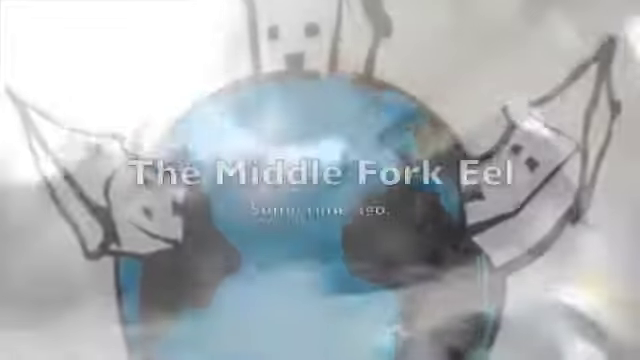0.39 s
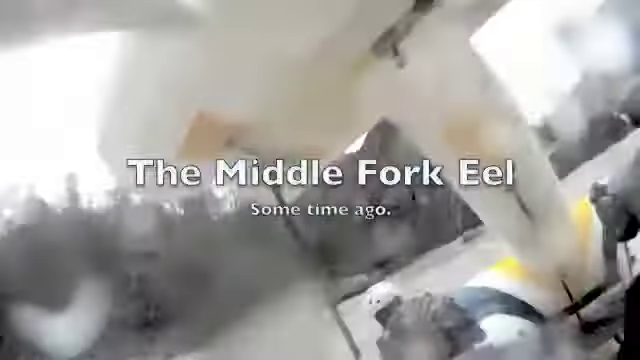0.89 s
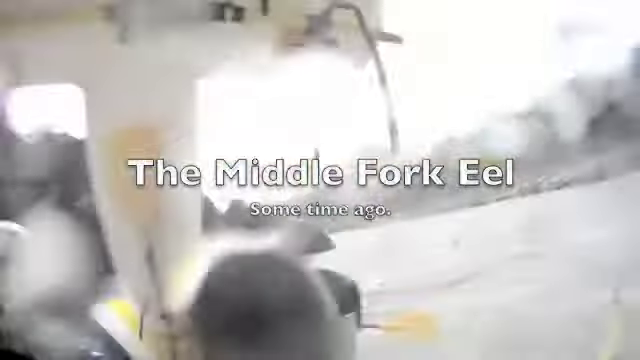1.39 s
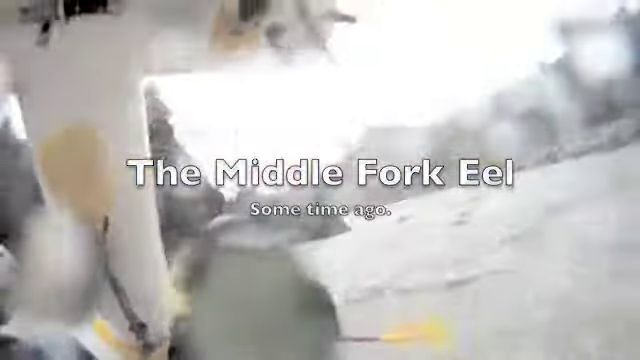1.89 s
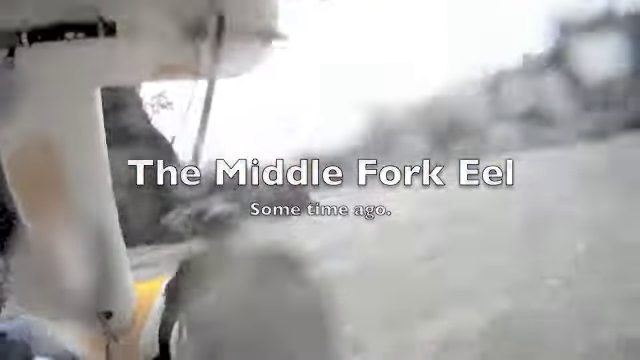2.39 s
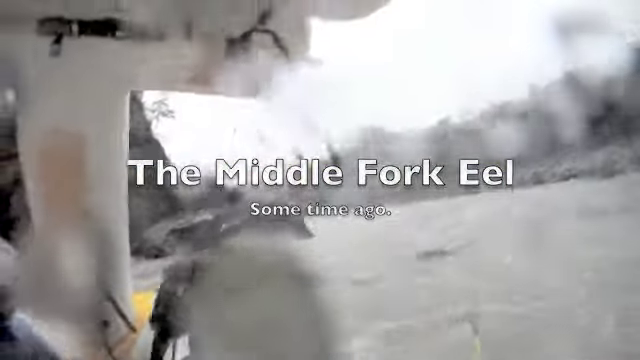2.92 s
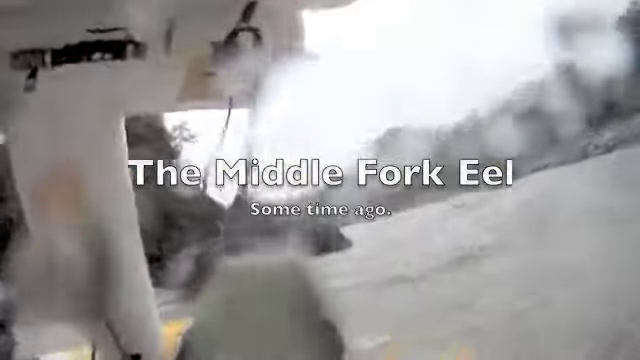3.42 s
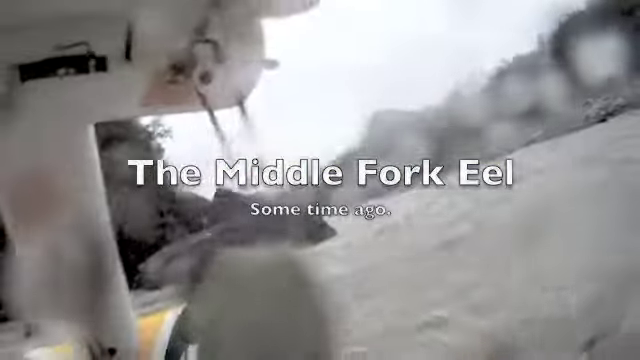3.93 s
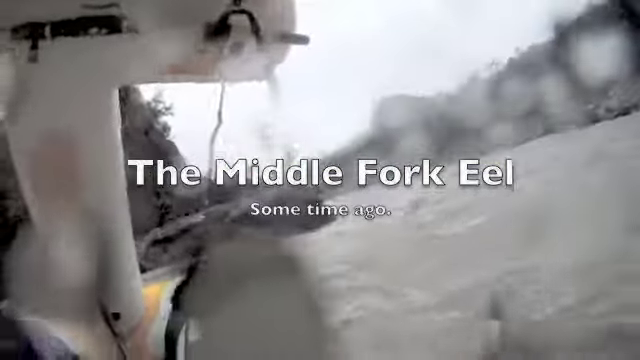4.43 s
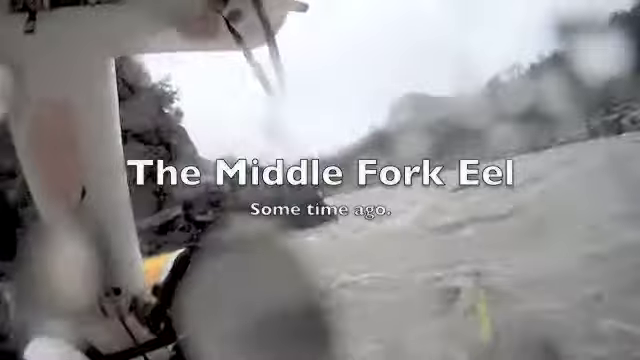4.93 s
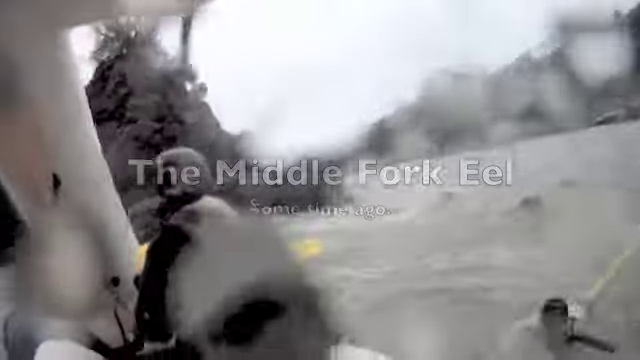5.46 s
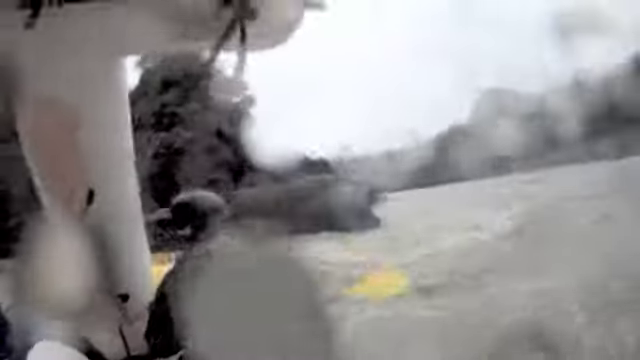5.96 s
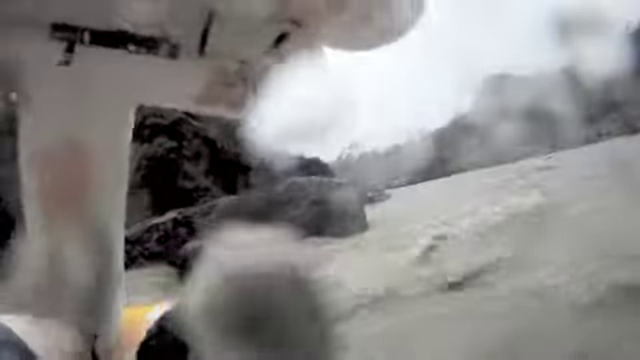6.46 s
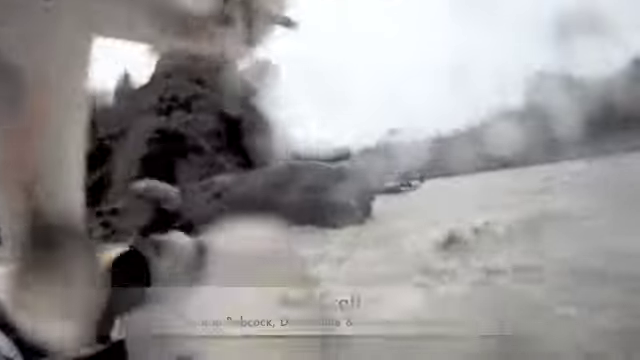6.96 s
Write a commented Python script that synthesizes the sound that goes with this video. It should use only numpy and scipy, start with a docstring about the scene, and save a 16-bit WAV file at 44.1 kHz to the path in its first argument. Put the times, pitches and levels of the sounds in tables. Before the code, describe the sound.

Hissing, foamy river rush fades in from silence, boxy and gritty, while loose straps click against the casing and dull thumps shake the mount.

```python
"""A river's rush and bursting foam fade in, heard through the ringing sealed housing of a small camera on a raft.
Loose straps knock on it in short four-note chords; bumps push the frame and rubs slip and scrape along it.
Droplets patter on the shell; the mount trembles at a low pitch over the dull wash under the raft.
Shaped noise makes the water, decaying sines the knocks, pulses and resonators the bumps and sway.
The recorder holds each of its 12000 samples a second, which mirrors the sound above 6 kHz."""
import sys
import numpy as np
from scipy import signal
from scipy.fft import rfft, irfft
from scipy.io import wavfile
from scipy.ndimage import uniform_filter1d

SR = 44100
rng = np.random.default_rng(int(sys.argv[2]) if len(sys.argv) > 2 else 0)


def transcribe(u):
    """Save the signal u as a 16-bit wav file named by the first command-line argument.

    u: samples, shape (n,) or (channels, n), limited to [-1, 1]; the rate is SR.
    q: integer samples, one column per channel.
    """
    v = np.clip(np.atleast_2d(u).T, -1, 1)
    q = np.round(v * 32767).astype(np.int16)
    wavfile.write(sys.argv[1], SR, q)


def boost_factor(decibels):
    """Convert a level in decibels to a linear amplitude factor."""
    exponent = np.asarray(decibels, float) / 20
    return 10 ** exponent


N = 312669
T = np.arange(N) / SR  # time in s
HZ = np.arange(1025) * SR / 2048 + 1  # filter grid, moved up 1 Hz so that its logarithm exists


def shape(x, gain):
    """Minimum-phase filter with the given gain on the HZ grid, made by folding its cepstrum forward."""
    cepstrum = irfft(np.log(gain))
    cepstrum[1:1024] *= 2
    cepstrum[1025:] = 0
    impulse = irfft(np.exp(rfft(cepstrum)))
    return signal.fftconvolve(x, impulse)[:N]


def colour(points):
    """Gain curve drawn through (Hz, dB) points along a logarithmic pitch axis."""
    hz, db = np.transpose(points)
    return boost_factor(np.interp(np.log(HZ), np.log(hz), db))


def ring(x, hz, t60):
    """One resonant mode driven by x, dying away by 60 dB in t60 seconds."""
    pole = np.exp(2j * np.pi * hz / SR - np.log(1000) / (t60 * SR))
    return signal.lfilter([1], [1, -pole], x).imag


def unit(x):
    """Scale to an rms of 1."""
    return x / np.sqrt(np.mean(x ** 2))


def walk(rate):
    """Smooth random drift: levels held 1 / rate s, slewed twice, scaled to an rms of 1."""
    hold = int(SR / rate)
    steps = np.repeat(rng.standard_normal(N // hold + 1), hold)
    slewed = uniform_filter1d(uniform_filter1d(steps, hold), hold)
    return unit(slewed[:N])


def add(out, s, wave):
    """Mix a short wave in at s seconds."""
    i = int(s * SR)
    out[i:i + len(wave)] += wave[:N - i]


# resonances of the sealed shell: pitch_hz, width_hz, lift_db
SHELL_MODES = [(830, 160, 3), (1166, 226, 10.5), (1463, 140, 4.5), (1687, 122, 4), (2063, 240, 4.5),
               (2740, 120, 2.5), (3570, 705, 9.5), (5050, 360, 3.5)]


def housing(x):
    """The sealed shell lifts its own resonances in all it passes on."""
    lift_db = sum(db / (1 + (2 * (HZ - hz) / width) ** 2) for hz, width, db in SHELL_MODES)
    return shape(x, boost_factor(lift_db))


# spectrum of white water, also worn by the spray: pitch_hz, relative_density_db
RUSH_COLOUR = [(400, -16.5), (600, -17), (900, -16), (1400, -12.5), (2000, -2.5), (2700, -5.5), (3300, -12),
               (4300, -16), (5200, -18.5), (5700, -19), (6000, -25.5)]


def rush(level_db, bright_db):
    """White water: hiss and bursting foam in half-octave bands that flicker separately under a shared surge."""
    pop_db = 2.7 * np.minimum(rng.exponential(size=N), 4.0)
    pops = (rng.random(N) < 900 / SR) * rng.standard_normal(N) * boost_factor(pop_db)  # 900 a second on average
    foam = 0.7 * unit(pops)
    surge = boost_factor(0.81 * walk(9) + 0.51 * walk(70))
    water = 0
    for hz in 420 * 2 ** np.arange(0, 4.5, .5):
        band_filter = signal.butter(2, [hz / 2 ** .25, hz * 2 ** .25], "band", fs=SR)
        band = signal.lfilter(*band_filter, rng.standard_normal(N) + foam)
        tilt_db = bright_db * np.log2(hz / 1800)
        water = water + band * boost_factor(.6 * walk(30) + tilt_db)
    return boost_factor(level_db + 1.32) * surge * unit(housing(shape(water, RUSH_GAIN)))


RUSH_GAIN = colour(RUSH_COLOUR)

# strap knocks: start_s, strike_db, main_pitch_hz, low_note_db and high_note_db (both against the main note)
STRAP_KNOCKS = [(0.5531, -30, 2030, 2, -20), (1.1989, -6, 2380, -19.5, -11),
                (1.2912, -24.5, 1830, -11, -16), (1.5262, -32, 2360, -20, -4),
                (2.4316, -21, 2000, -12, -17), (2.4378, -29, 1950, -17, -4.5), (2.4454, -28, 2060, 5, -30),
                (2.5036, -32, 2100, -15, -27), (2.7726, -12.5, 2000, -11.5, -14),
                (2.8494, -20, 2220, -8.5, 1), (3.4211, -17, 2080, -39, -12.5),
                (3.6194, -19.5, 2270, -31, -12), (3.6418, -30, 1800, -4, -21),
                (3.8377, -13.5, 2160, -9.5, -11.5), (4.067, -39, 2030, 5.5, -17),
                (4.0948, -24.5, 2050, 1, -20), (4.1026, -22, 1840, -17, -33),
                (4.5117, -30.5, 1830, -7, -13), (4.7722, -21, 2160, -35, -12),
                (4.9096, -25, 1950, -17, -26), (5.0095, -24, 2150, -28, -9), (5.0838, -25, 2110, -22, -13),
                (5.2649, -23, 1780, -4.5, -33), (5.5992, -26.5, 1650, -5, -15),
                (5.7607, -18, 1760, -16, -11), (6.1796, -27.5, 1930, -7, -11),
                (6.2268, -19.5, 1970, -5.5, -7.5), (6.2875, -30, 1700, -6, -19),
                (6.318, -26.5, 1680, -4, -20)]
# spectrum of the rattle after a knock: pitch_hz, relative_density_db
RATTLE_COLOUR = [(500, -27), (900, -0.5), (1200, 2), (2000, 3), (3000, 1), (4500, -33), (6000, -38)]


def knocks():
    """Loose straps and faint chance taps: a hard contact sounds four notes at once, then a short dull rattle."""
    low_hz, high_hz, top_hz = 1160, 3330, 4610
    notes, rattle, t = np.zeros(N), np.zeros(N), T[:2048]
    # chance taps have the columns of a knock: their averages, then their spreads
    tap, tap_spread, tap_count = (-38.5, 1948, -13, -22), (1.5, 200, 8.7, 5.9), 16
    tap_values = tap + tap_spread * rng.standard_normal((tap_count, 4))
    taps = np.c_[rng.random(tap_count) * T[-1], tap_values]
    for s, db, hz, low_db, high_db in [*STRAP_KNOCKS, *taps]:
        hiss = rng.standard_normal(len(t))
        # a weaker high note makes the knock swell and die sooner
        peak_ms = max(0.65 + 0.022 * high_db, .2)
        u = t / (peak_ms / 1000)
        top_db = 0.5 + 0.86 * low_db + 0.47 * high_db
        chord = np.sin(2 * np.pi * hz * t) + 0.05 * hiss
        chord = chord + boost_factor(low_db) * np.sin(2 * np.pi * low_hz * t)
        chord = chord + boost_factor(high_db) * np.sin(2 * np.pi * high_hz * t)
        chord = chord + boost_factor(top_db) * np.sin(2 * np.pi * top_hz * t)
        add(notes, s, boost_factor(db) * chord * u * np.exp(1 - u))
        decay = np.exp(-np.log(1000) * t / 0.012)  # 60 dB in 12 ms
        add(rattle, s + 0.002492, boost_factor(db + 0.32 * low_db + 4) * hiss[::-1] * decay)
    notes = shape(notes, colour([(300, -21), (900, -11.0), (1500, -3.0), (3600, -4),
                                 (4500, -9), (5100, 0), (6000, -6.5)]))
    return housing(notes + shape(rattle, boost_factor(-7.5) * colour(RATTLE_COLOUR)))


# modes of the frame: pitch_hz, relative_db, t60_s
FRAME_MODES = [(104, 7.5, 0.042), (159, -0.5, 0.033), (211.5, -1.5, 0.065), (297, -27, 0.033),
               (376, -11, 0.022)]


def frame(force):
    """The frame passes a force on and rings with it."""
    return force + sum(boost_factor(db - 37) * ring(force, hz, t60) for hz, db, t60 in FRAME_MODES)


# bumps on the frame: centre_s, push_db, sway_kick_db
FRAME_BUMPS = [(0.561, -39, -29), (0.589, -22.5, -25), (.672, -37, -30), (0.699, -47, -30),
               (1.203, -41, -40), (1.227, -27, -31), (1.291, -44.5, -30.5), (1.316, -57, -34.5),
               (2.421, -31, -48), (2.435, -23, -48), (2.446, -22, -32), (2.465, -25, -24),
               (2.473, -21, -20), (2.519, -37, -34), (2.532, -31.5, -27), (2.546, -48, -19.5),
               (4.596, -34.5, -31), (4.618, -35, -24), (4.645, -20, -24), (4.671, -53, -31),
               (4.713, -33.5, -26.5), (4.745, -55, -28.5)]
# modes of the mount on its arm: pitch_hz, relative_db, t60_s
MOUNT_MODES = [(27.5, -40, 0.056), (39.1, 2.5, 0.22), (57.7, -30, .1)]


def bumps():
    """Soft pushes: a dip in pressure between two small swells, and a kick that sets the mount ringing."""
    push, kick, t = np.zeros(N), np.zeros(N), T[:882] - T[441]
    u = t / (3.3 / 1000 / np.pi)  # the dip crosses zero 3.3 / pi ms either side of its centre
    dip = -(1 - u ** 2) * np.exp(-u ** 2 / 2)
    shove = -np.hanning(len(t)) / 441
    for s, db, sway_db in FRAME_BUMPS:
        add(push, s - T[441], boost_factor(db) * dip)
        add(kick, s - T[441], boost_factor(sway_db) * shove)
    mount = sum(boost_factor(db) * ring(kick, hz, t60) for hz, db, t60 in MOUNT_MODES)
    return frame(push) + mount


# rubs along the frame: fastest_s (middle of the stroke), length_s, slip_db, top_slip_rate_hz, scrape_db
FRAME_RUBS = [(.838, .25, -36.5, 323.4, -39), (1.105, .09, -56, 222, -44), (2.454, .068, -41, 224, -40),
              (4.631, .07, -50, 205, -42)]
# spectrum of the scraping grit: pitch_hz, relative_density_db
SCRAPE_COLOUR = [(400, -24), (700, 2.5), (1200, -6.5), (2000, 8.5), (3000, -4), (4500, -24), (6000, -17)]


def rubs():
    """Stick-slip: slips speed up and slow down, lifted around one frame note, with judder and scraping grit."""
    slope_hz_per_s, turn_s = 1900, .022  # the slip rate climbs and falls at this slope, rounded at the top
    lock_hz, lock_width_hz, lock_lift_db = 224, 58, 8  # slips grow where they meet the frame note
    out = 0
    for s, length, slip_db, top_hz, scrape_db in FRAME_RUBS:
        edge = np.clip((length / 2 - abs(T - s)) / 0.002, 0, 1)
        t = np.clip(T - s, -length / 2, length / 2)
        hz = top_hz - slope_hz_per_s * (np.hypot(t, turn_s) - turn_s)
        # pressure eases towards both ends and along the stroke
        press_db = -19.5 * (2 * t / length) ** 2 - 18 * t
        lock_db = lock_lift_db / (1 + (2 * (hz - lock_hz) / lock_width_hz) ** 2)
        turns = np.cumsum(hz * (1 + .028 * walk(90))) / SR
        slips = np.sin(2 * np.pi * turns) + 0.066 * np.sin(4 * np.pi * turns)
        slips = slips * boost_factor(slip_db + press_db + lock_db + 1.8 * walk(100))
        # a rough tone near the frame note, stronger under faster slips
        judder = unit(ring(ring(rng.standard_normal(N), 220, 0.054), 220, 0.052))
        judder = judder * boost_factor(slip_db + press_db - 10.5 + 0.1119 * (hz - lock_hz))
        # each slip sets off a burst of grit, which wears off over the stroke
        bursts = np.exp(-(turns % 1) / 0.18)
        grit = rng.standard_normal(N) * bursts * boost_factor(2.2 * walk(200) + 0.85 * walk(40))
        scrape = unit(housing(housing(shape(grit, colour(SCRAPE_COLOUR)))))
        scrape = scrape * boost_factor(scrape_db + 0.71 * press_db - 7.5 * t / length)
        out = out + frame(edge * slips) + edge * judder + edge * scrape
    return out


# spray on the housing: start_s, length_s, level_db
SPRAY_FLURRIES = [(1.908, 0.062, -40.5), (2.006, 0.052, -43), (2.16, 0.036, -41.5), (3.505, 0.034, -45),
                  (5.13, .09, -43.5)]


def spray():
    """Flurries of droplets patter on the housing, swell and stop short: uneven noise in the rush's colour."""
    patter = rng.standard_normal(N) * boost_factor(4.1 * walk(300))
    drops = unit(housing(shape(patter, RUSH_GAIN)))
    swell = 0
    for s, length, db in SPRAY_FLURRIES:
        inside = (T > s) * (T < s + length)
        swell = swell + boost_factor(db) * inside * (0.52 + 0.7 * (T - s) / length)
    return uniform_filter1d(swell, size=88) * drops  # 2 ms edges


def sway(level_db):
    """The current keeps the mount trembling: noise through two close low modes in series."""
    tremble = ring(ring(rng.standard_normal(N), 45.1, 0.16), 48.5, 0.1)
    return boost_factor(level_db) * unit(tremble)


# spectrum of the wash: pitch_hz, relative_density_db
WASH_COLOUR = [(40, 6), (90, 1.5), (200, 3.5), (350, 0), (550, -21), (900, -31)]


def wash(level_db):
    """Water slapping under the tubes: a dull uneven rumble of low-coloured noise."""
    rumble = unit(shape(rng.standard_normal(N), colour(WASH_COLOUR)))
    return boost_factor(level_db + 0.57 * walk(11)) * rumble


# course of the river, joined by straight lines: time_s, rush_db, wash_db, sway_db
RIVER_COURSE = [(.3, -45.5, -59.5, -49), (.6, -43.5, -57, -38), (.72, -42.5, -47, -41),
                (.82, -44, -47, -42), (.96, -43, -52, -49), (1.35, -45.5, -56.5, -53),
                (1.84, -44.5, -59.5, -54), (2.3, -47.5, -59, -54), (2.67, -46.5, -55.5, -45.5),
                (3.1, -46, -59.5, -61), (3.7, -46, -57, -56), (3.96, -46, -61, -67), (4.3, -48.5, -58, -59),
                (4.7, -44.5, -54.5, -59.5), (5.15, -43.5, -55.5, -55), (5.58, -43, -56.5, -58.5),
                (5.9, -41, -52.5, -62), (6.6, -42.5, -52.5, -76), (6.82, -41.5, -55.5, -45.5),
                (7.09, -40.5, -52, -62.5)]


def scene():
    """All sources add up at the same single microphone."""
    s, *columns = np.transpose(RIVER_COURSE)
    rush_db, wash_db, sway_db = (np.interp(T, s, c) for c in columns)
    bright_db = -0.69 + 0.84 * walk(3.18)  # drifting tilt of the rush, dB per octave
    river = rush(rush_db, bright_db) + wash(wash_db) + spray()
    raft = sway(sway_db + 2.4 * walk(6)) + knocks() + bumps() + rubs()
    return (river + raft)[None]


def roll_off(x):
    """The treble ends steeply here."""
    return signal.sosfilt(signal.butter(12, 16470, fs=SR, output="sos"), x)


def record(dry):
    """Each sample is held as a step, which mirrors the sound above half the held rate; top cut, faded in."""
    held_rate_hz, top_hz = 12000, 15300
    fade_start_s, fade_end_s = 0.21, 0.73
    slow = signal.resample_poly(dry, held_rate_hz, SR, axis=1)
    steps = np.repeat(slow, 4, axis=1)
    held = signal.resample_poly(steps, SR, 4 * held_rate_hz, axis=1)
    held = np.pad(held, ((0, 0), (0, 8)))[:, :N]
    top_cut = signal.ellip(6, .3, 26, top_hz, fs=SR, output="sos")
    fade = np.clip((T - fade_start_s) / (fade_end_s - fade_start_s), 0, 1)
    mix = signal.sosfilt(top_cut, held) * fade
    return roll_off(mix)


dry = scene()
out = record(dry)
transcribe(out)
```